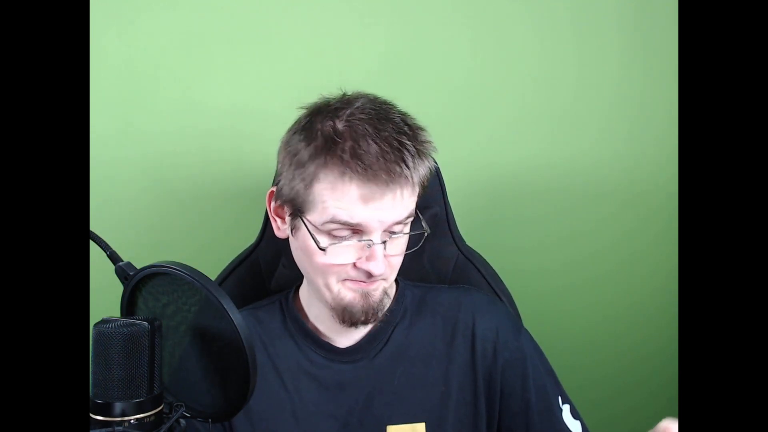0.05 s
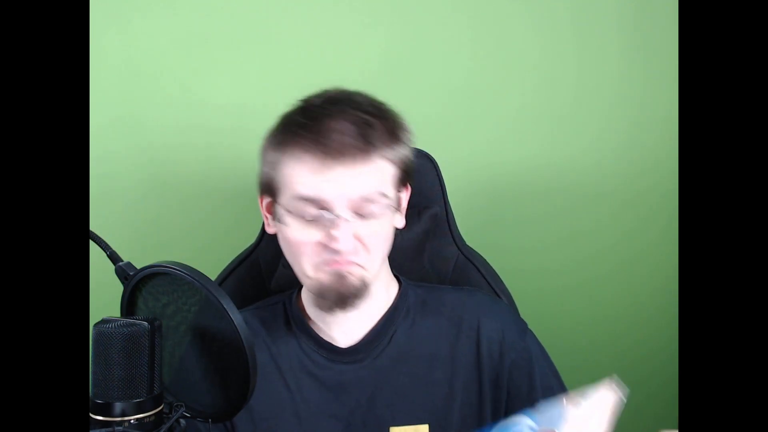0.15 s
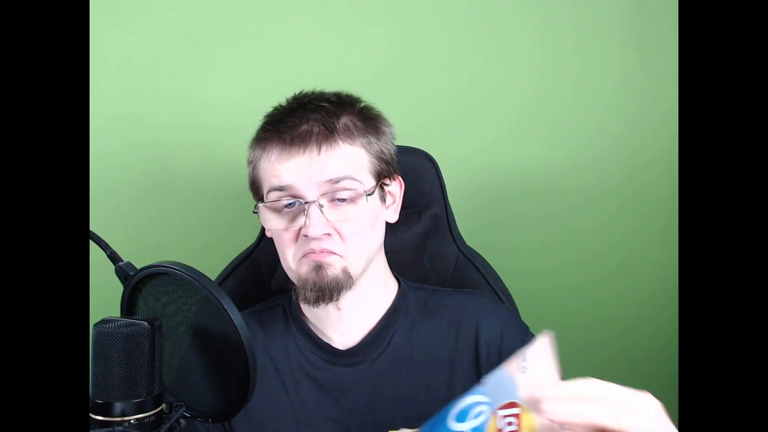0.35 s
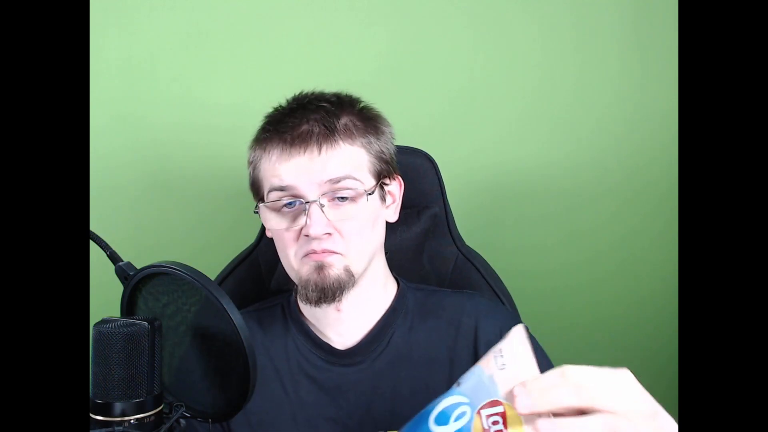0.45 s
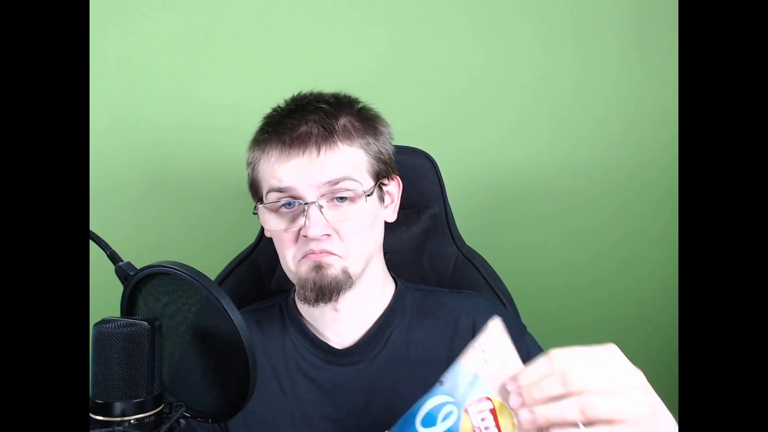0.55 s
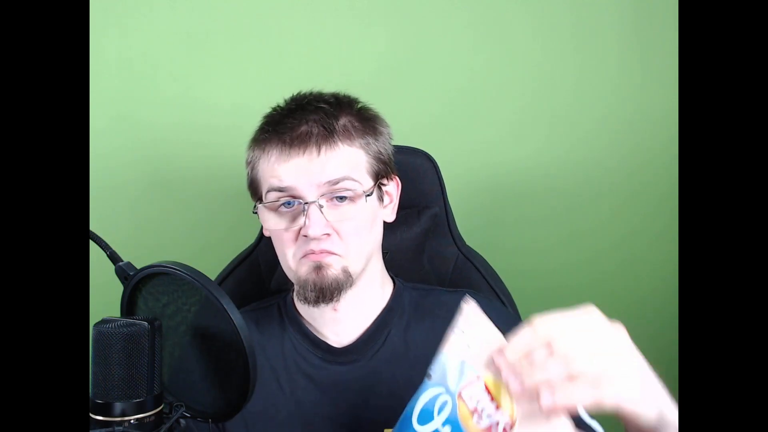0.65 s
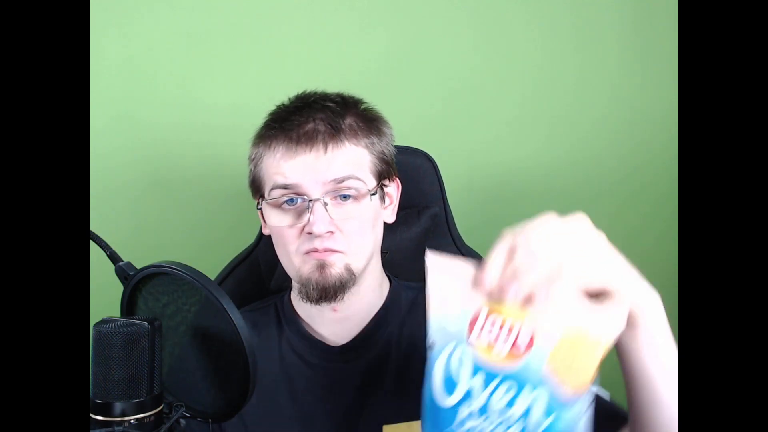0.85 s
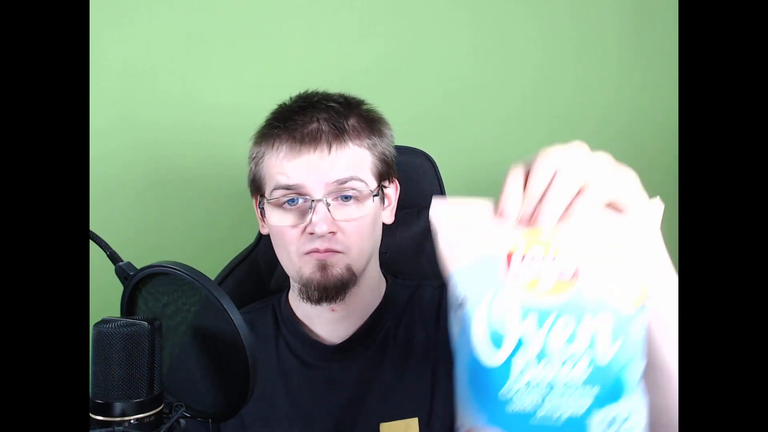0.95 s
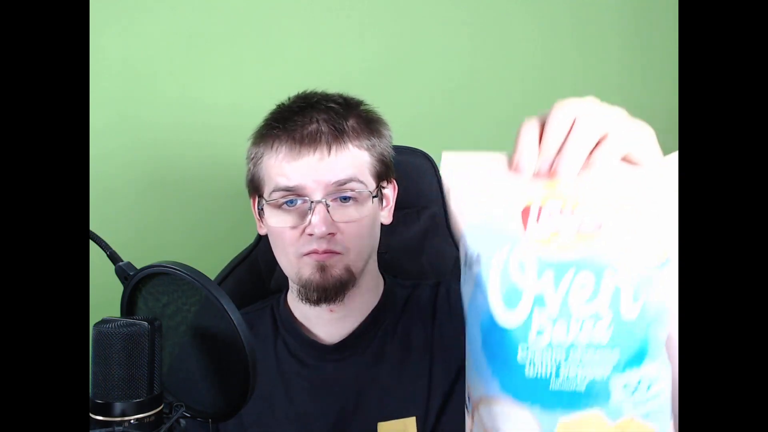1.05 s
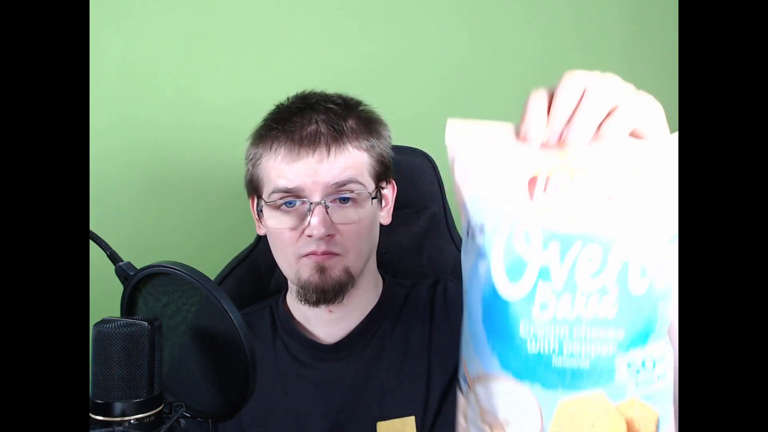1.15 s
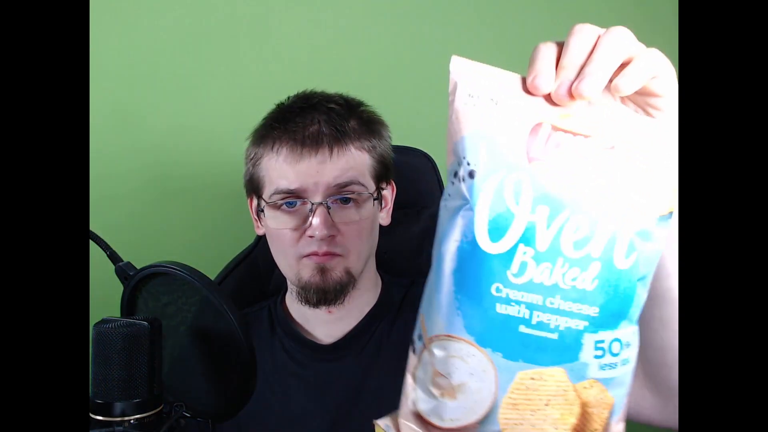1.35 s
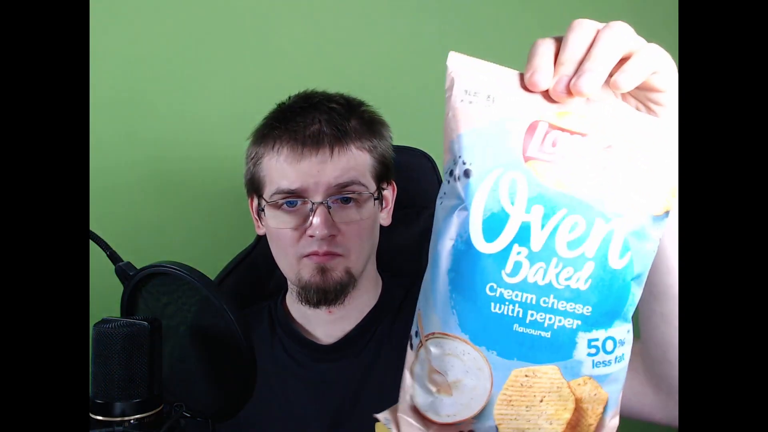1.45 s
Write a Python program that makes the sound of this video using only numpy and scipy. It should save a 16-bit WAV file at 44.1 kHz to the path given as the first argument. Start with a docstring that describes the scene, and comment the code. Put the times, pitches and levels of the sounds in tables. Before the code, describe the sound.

A foil snack bag rustles close to a microphone in a quiet room: faint ticks, then a sudden burst of sharp snaps and dense crackle with soft bass thumps, then only sparse weak crinkles.

```python
"""Foil snack bag, grabbed and lifted

A foil snack bag is grabbed and lifted near a microphone in a quiet room.
Creases snap one by one: noise bursts drive the resonances of the film.
Under them a dense crackle of tiny folds: windowed sines of a few cycles at random instants.
The air-filled bag thumps in the bass: two bands of noise under level curves.
The room rings on as a tail of decaying noise; a steady coloured hush lies below.
"""
import sys
import numpy as np
from scipy import signal
from scipy.fft import rfft, irfft
from scipy.io import wavfile
from scipy.ndimage import uniform_filter1d

SR = 44100
rng = np.random.default_rng(int(sys.argv[2]) if len(sys.argv) > 2 else 0)


def nominal_scale(level):
    """Amplitude ratio for a level in decibels (scalar or array-like)."""
    x = np.asarray(level, float) / 20
    return 10 ** x


def dump_mix(stems):
    """Bounce the given channels to the path in sys.argv[1] as a 16-bit WAV at rate SR."""
    frames = np.atleast_2d(stems).T  # one column per channel
    limited = np.clip(frames, -1, 1)  # hard clip at full scale
    pcm = np.round(limited * 32767).astype(np.int16)
    wavfile.write(sys.argv[1], SR, pcm)


N = 66150  # samples


def evened(x):
    """Scales to rms 1."""
    return x / np.sqrt(np.mean(x ** 2) + 1e-20)


def read(points, hz):
    """Reads a table over frequency on a log axis."""
    table_hz, value = np.transpose(points)
    return np.interp(np.log(hz + 1), np.log(table_hz + 1), value)


def control(table, index):
    """One column of a time table, per sample."""
    rows = np.array(table)
    return np.interp(np.arange(N) / SR, rows[:, 0], rows[:, index])


def coloured(points):
    """Steady noise of rms 1 with the given spectrum."""
    spectrum = rfft(rng.standard_normal(N))
    return evened(irfft(spectrum * nominal_scale(read(points, np.fft.rfftfreq(N, 1 / SR))), N))


def steadied(x, span_s):
    """Evens out the chance swells of a narrow noise."""
    power = uniform_filter1d(x ** 2, size=round(span_s * SR))
    return evened(x / np.sqrt(power + .1))


def add(mix, start_s, sound):
    """Mixes a sound in at its start time."""
    part = mix[round(start_s * SR):][:len(sound)]
    part += sound[:len(part)]


# resonances of the film: (frequency [Hz], relative density [dB per Hz])
FILM_RESONANCES = [(60, -30), (200, -12), (350, -3), (470, -12), (620, 2), (760, -3), (1000, -12),
                   (1300, -1), (1550, -8), (1850, 0), (2100, -4), (2500, 0), (3100, -10), (4000, -2),
                   (5000, -13), (6100, -3), (7500, -13), (9000, -10), (13000, -21), (16000, -32)]
# centres of the bass, middle, upper and top parts: (frequency [Hz])
PART_CENTRES_HZ = [600, 2400, 5500, 11000]
RESONANCE_SCATTER, RISE_SHARE = .03, .15  # relative sd per crease; share of the ring time


def snap(level_db, bass_db, upper_db, top_db, ring_ms):
    """A crease buckles: a quick burst of slips drives the resonances of the film."""
    ring_s = ring_ms / 1000
    rings = np.arange(1024) / SR / ring_s
    slips = rng.standard_normal(1024) * np.minimum(rings / RISE_SHARE, 1) * nominal_scale(-20 * rings)
    hz = abs(np.fft.fftfreq(2048, 1 / SR))
    shape_db = read(FILM_RESONANCES, hz * (1 + RESONANCE_SCATTER * rng.standard_normal()))
    shape_db += read(list(zip(PART_CENTRES_HZ, [bass_db, 0, upper_db, top_db])), hz)
    # the film, not the chance of the slips, sets the colour
    slip_power = uniform_filter1d(abs(np.fft.fft(slips, 2048)) ** 2, size=7, mode="wrap")
    shape_db -= 10 * np.log10(slip_power)
    # minimum phase: the response starts at once
    response = np.exp(np.conj(signal.hilbert(np.log(nominal_scale(shape_db)))))
    out = np.convolve(slips, np.fft.ifft(response).real[:1024])
    # level = rms if the energy filled one ring time
    return nominal_scale(level_db) * out / np.linalg.norm(out) * np.sqrt(ring_s * SR)


# creases that snap: (time [s], level [dB], bass part [dB], upper part [dB], top part [dB],
# ring: time for the slips to fall 20 dB [ms])
CREASE_SNAPS = [(.0630, -48.5, -17, 4.5, 7, 3.4), (0.0903, -67, -22, 6, -12, 2.4),
                (0.0956, -53, -9, -1, -22, 2.5), (0.127, -64, -15, 1, 9, 2),
                (0.1423, -49.5, -30, -4, -28, 3.4), (0.1763, -55, -19, 2, 0, 3),
                (0.2156, -27.5, -9.5, 8.5, 8.5, 2.5), (0.2196, -27.5, -4.5, -4.5, 2.5, 3),
                (0.224, -33, -15.5, 7.5, 1.5, 3.2), (.2390, -40.5, -1.5, 4.5, -8, 5.4),
                (.2465, -39, 1, -5, -6, 3.3), (0.2623, -39, 3, -13, -11.5, 3.5),
                (0.2727, -29, -4, -4, -18.5, 2), (.3060, -41.5, 12, 1.5, -4, 10.8),
                (0.368, -46.5, 0.5, -14, -14, 9.5), (0.384, -28, -1, 5, -4, 3),
                (0.3942, -34, -11, 9, 13.5, 3.1), (0.404, -48.5, -9, 1, -4, 0.88),
                (.4228, -32.5, -2, 1, -2, 7.1), (.4600, -47.5, 10, -10, -17, 4),
                (.4675, -43, -1, -3, -8.5, 3.8), (0.4883, -27, -9, 1.5, -8.5, 2.6),
                (.5050, -49, -4, 9, -3.5, 1.4), (0.5231, -37.5, 4.5, -10, -11, 10.6),
                (.5640, -43, -11, 4.5, 4, 5.5), (.5895, -41, -10, -7, -18, 4),
                (.6920, -71, -10, 1, 15.5, 3), (0.7343, -53.5, 8.5, -11, -36, 12.3),
                (.7810, -48, 22.5, 1.5, -6, 5.3), (0.8547, -43, 4, -3, -11, 12.2),
                (.8680, -56.5, -10, 21, 10, 4.1), (1.1050, -37.5, 2.5, -20, -33, 9.1),
                (1.1325, -58.5, -16, 15, 0, 3.4), (1.2590, -73, -11.5, 11, 9.5, 5),
                (1.3322, -70.5, -8.5, 5.5, -3, 4.2), (1.4744, -55.5, 8.5, -20, -14, 7.7),
                (1.4900, -49, -2, -7, 6, 4), (1.4935, -43.5, 1, 0.5, 13.5, 8.5)]


def snaps():
    """Creases of the film buckle one by one."""
    out = np.zeros(N)
    for start_s, *settings in CREASE_SNAPS:
        add(out, start_s, snap(*settings))
    return out


# crumpling: (time [s], crackle level before CRACKLE_TRIM_DB [dB], brightness about 3 kHz [dB per octave])
CRUMPLING = [(0, -48, 3), (.04, -57.5, 0), (.13, -68, -2.5), (.18, -55.5, 1.5), (.21, -52, 2.5),
             (.222, -37, 1.5), (.26, -35.5, 2), (.305, -42.5, 0), (.33, -58, 3.5), (.365, -51, 0.5),
             (.39, -39, -1), (.44, -53, -1), (.47, -38, -0.5), (.50, -34, 3), (.535, -37.5, -1),
             (.575, -46, 0), (.60, -37.5, -0.5), (.625, -40, 3), (.645, -66.5, -3), (.72, -63, -4.5),
             (.84, -65, 2), (.90, -58, 0), (1.0, -65, 4.5), (1.09, -76.5, -7.5), (1.15, -71, 2),
             (1.24, -81, 1), (1.46, -91, -2), (1.5, -50, 0)]
# colour of the folds before brightness: (frequency [Hz], relative density [dB per Hz])
FOLD_COLOUR = [(120, -32), (200, -3.5), (373, -10.5), (409, 1), (659, -4), (1650, -3.5), (5330, -15),
               (6880, -13), (16000, -38)]
FOLDS_PER_S, SIZE_SPREAD_DB, FOLD_CYCLES, CRACKLE_TRIM_DB = 9000, 3.0, 3.8, -1


def crackle():
    """Tiny folds of a few cycles each, a few large; brighter crumpling favours the high ones."""
    pitches_hz = np.geomspace(250, 15000, num=30)
    size = nominal_scale(SIZE_SPREAD_DB * np.minimum(rng.exponential(1, N), 4))
    size *= rng.random(N) < FOLDS_PER_S / SR
    kind = rng.integers(0, len(pitches_hz), N)
    bright_db_per_octave = control(CRUMPLING, index=2)
    out = np.zeros(N)
    for k, hz in enumerate(pitches_hz):
        cycles = np.arange(2048) * hz / SR
        window = np.sin(np.pi * np.minimum(cycles / FOLD_CYCLES, 1)) ** 2
        fold = window * np.sin(2 * np.pi * cycles)
        # sqrt(hz): log-spaced pitches cover bands as wide as hz
        fold *= nominal_scale(read(FOLD_COLOUR, hz)) * np.sqrt(hz) / np.linalg.norm(fold)
        folds = signal.oaconvolve(size * (kind == k), fold)[:N]
        out += folds * nominal_scale(bright_db_per_octave * np.log2(hz / 3000))
    return nominal_scale(CRACKLE_TRIM_DB + control(CRUMPLING, index=1)) * evened(out)


# heaving air: (time [s], deep level [dB], low level [dB])
AIR_HEAVE = [(0.0, -78, -58), (0.062, -57.5, -64.5), (0.112, -62, -78), (0.188, -63.5, -64.5),
             (0.232, -34, -38.5), (0.274, -53, -47), (0.312, -33, -49.5), (0.346, -59, -69),
             (0.4, -45.5, -56.5), (0.43, -47.5, -47.5), (0.458, -84, -64), (0.496, -41.5, -42.5),
             (0.6, -68, -59.5), (0.802, -79, -60), (0.83, -90, -83), (0.864, -56.5, -48),
             (0.898, -76, -64.5), (1.052, -80, -70.5), (1.098, -74, -56.5), (1.252, -62, -75.5),
             (1.436, -77, -76.5), (1.5, -50, -69.5)]
# deep part: (frequency [Hz], relative density [dB per Hz])
DEEP_COLOUR = [(12, -27.5), (25, -6.5), (50, 1), (80, -4), (110, -28.5), (300, -71.5)]
# low part: (frequency [Hz], relative density [dB per Hz])
LOW_COLOUR = [(40, -53), (80, -1.5), (115, 0), (170, -5), (235, -2.5), (330, -13), (500, -21), (1000, -90)]


def heave():
    """The air in the bag heaves: two bands of bass noise follow level curves."""
    deep = nominal_scale(control(AIR_HEAVE, index=1)) * steadied(coloured(DEEP_COLOUR), span_s=0.022)
    low = nominal_scale(control(AIR_HEAVE, index=2)) * steadied(coloured(LOW_COLOUR), span_s=0.011)
    return deep + low


# reverberation: (frequency [Hz], t60 [s])
ROOM_DECAY = [(200, 0.15), (600, 0.33), (1500, 0.25), (4000, 0.31), (10000, 0.43)]
ROOM_DB, FIRST_ECHO_S = -7.5, .004  # tail energy re direct sound; tail onset


def room(x):
    """A dense tail of echoes, each band dying at its own speed."""
    taps = rng.standard_normal(SR // 2) * (np.arange(SR // 2) > FIRST_ECHO_S * SR)
    hz, t, bands = signal.stft(taps, SR, nperseg=128)
    decay_db = -60 * t / read(ROOM_DECAY, hz)[:, None]
    tail = signal.istft(bands * nominal_scale(decay_db), SR, nperseg=128)[1]
    return nominal_scale(ROOM_DB) * signal.fftconvolve(x, tail / np.linalg.norm(tail))[:N]


# background hush: (frequency [Hz], relative density [dB per Hz])
HUSH_COLOUR = [(20, -6.5), (60, -27.5), (200, -31), (500, -28.5), (1000, -38.5), (3000, -52), (8000, -52.5),
               (16000, -56)]
HUSH_DB = -64.5  # rms


def hush():
    """Steady coloured noise of the quiet background."""
    return nominal_scale(HUSH_DB) * coloured(HUSH_COLOUR)


def scene():
    """Snaps and crackle with their room, the heaving bass and the hush."""
    bag = snaps() + crackle()
    return (bag + heave() + room(bag) + hush())[None]


def low_pass(x):
    """Removes everything above the highest recorded frequency."""
    return signal.sosfilt(signal.butter(12, 16510, fs=SR, output="sos"), x)


def record(dry):
    """Turns the finished mix into the output."""
    return low_pass(dry)


dry = scene()
out = record(dry)
dump_mix(out)
```